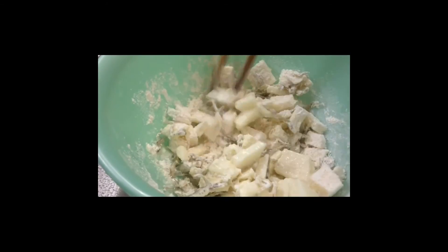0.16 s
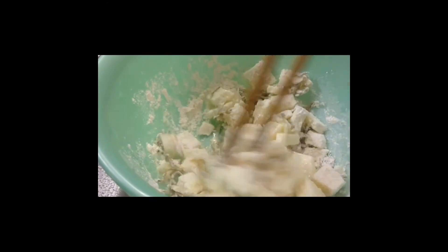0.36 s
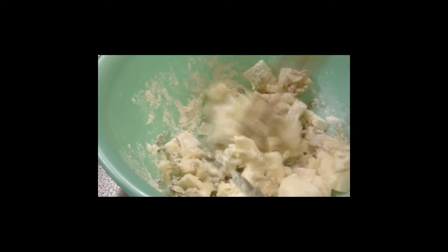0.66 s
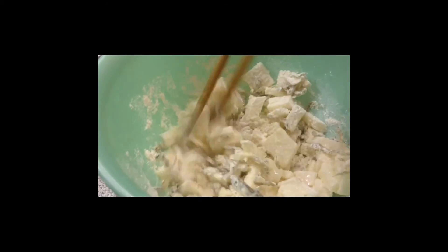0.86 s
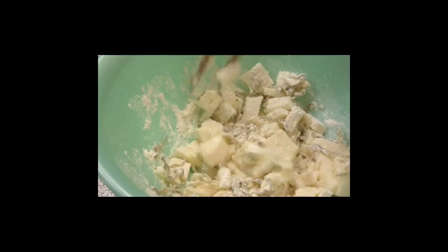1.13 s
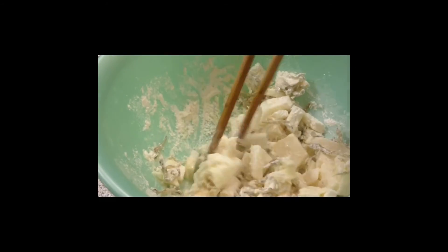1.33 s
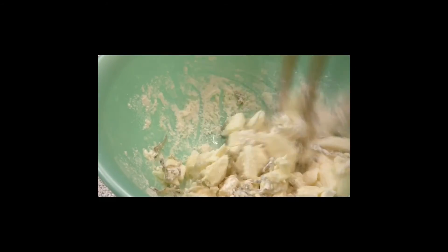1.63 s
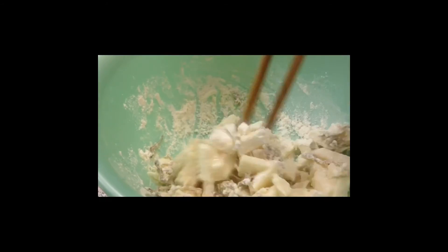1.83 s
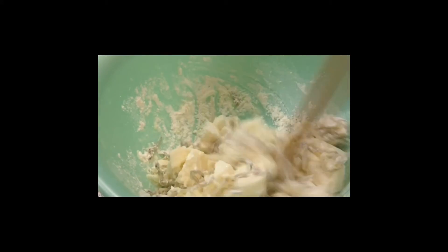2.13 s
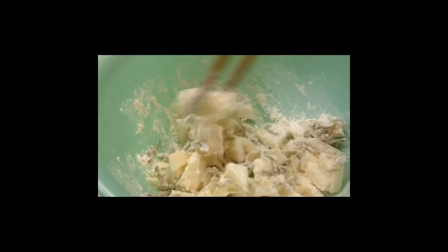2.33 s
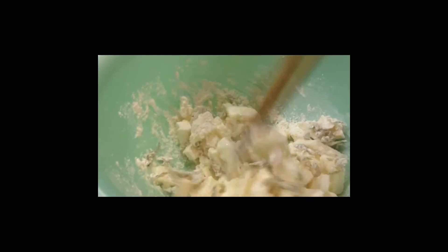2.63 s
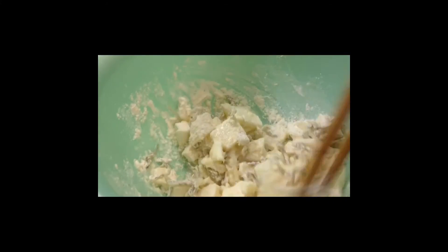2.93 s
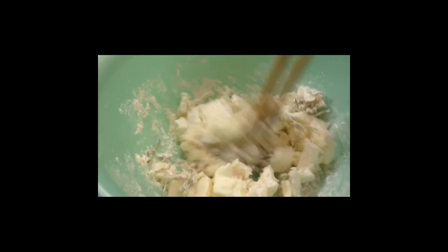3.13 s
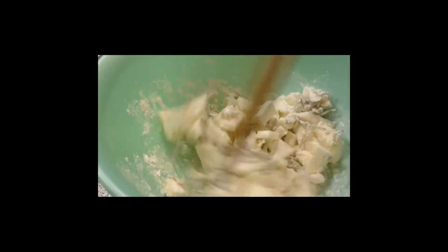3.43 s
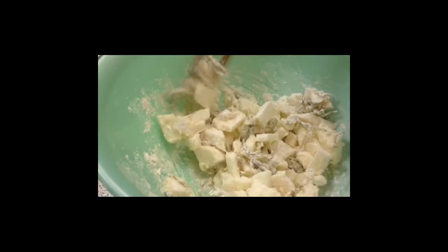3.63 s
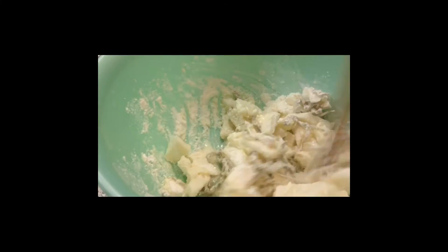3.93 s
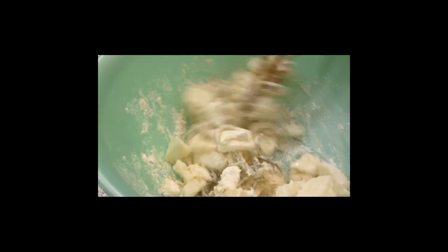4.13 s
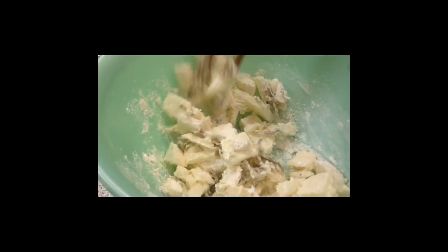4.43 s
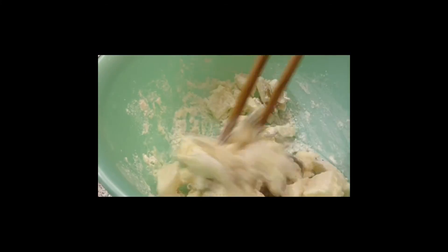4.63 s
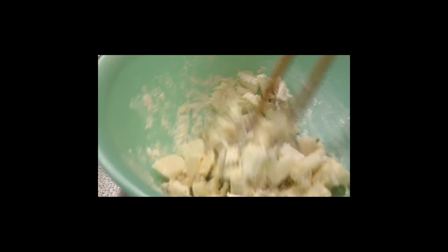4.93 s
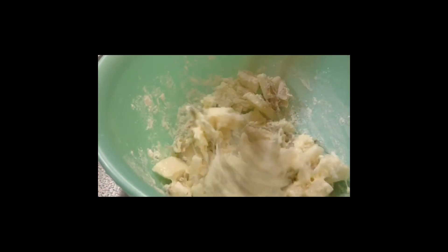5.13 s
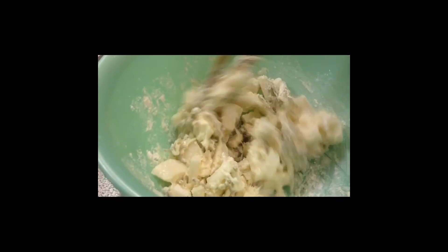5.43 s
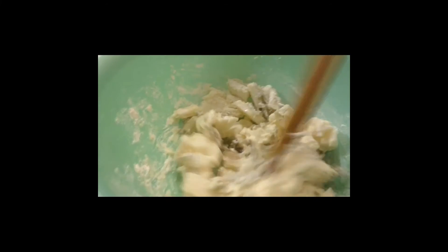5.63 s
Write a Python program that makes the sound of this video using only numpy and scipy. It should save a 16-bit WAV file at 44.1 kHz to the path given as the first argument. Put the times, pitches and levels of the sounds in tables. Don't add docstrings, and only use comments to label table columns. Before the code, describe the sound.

Close to a small microphone in a kitchen, wooden chopsticks stir floury cubes in a thin plastic bowl. Gritty, hissing strokes come and go about two or three times a second, with crackly crumbs, sharp wooden ticks and short hollow bowl thuds. The sticks clack loudest a little after four seconds, then stirring continues over a faint steady hum.

```python
import sys
import numpy as np
from scipy import signal
from scipy.fft import rfft, irfft
from scipy.io import wavfile
from scipy.ndimage import uniform_filter1d

SR = 44100
rng = np.random.default_rng(int(sys.argv[2]) if len(sys.argv) > 2 else 0)


def wav_record(signal):
    frames = np.transpose(np.atleast_2d(signal))
    bounded = np.clip(frames, -1, 1)
    quanta = np.round(bounded * 32767).astype(np.int16)
    wavfile.write(sys.argv[1], SR, quanta)


def amplitude_ratio(level_db):
    exponent = np.asarray(level_db, float) / 20
    return 10 ** exponent


N = 254898

# f/Hz, width/Hz, level/dB
BOWL_DEEP_MODES = [(116.3, 30, -6.5), (145.6, 17.7, 1), (170.9, 11.5, 5.5)]
BOWL_LOW_MODES = [(207, 38, -5.5), (258, 25.7, 2), (348.3, 46, -4.5), (445.7, 18.2, -4)]
BOWL_UPPER_MODES = [(500, 16, 8), (695, 66, 8.5), (860, 91, 9.5), (1023, 210, 3.5), (1080, 25, 7),
                    (1580, 155, 2), (2340, 320, 0.5), (2600, 230, -0.5)]
# f/Hz, width/Hz, level/dB
STICK_MODES = [(1592, 64, 24), (2500, 5400, 3.5), (3200, 500, -38), (4200, 1100, 17.5), (6100, 4200, 1),
               (6600, 420, 14.5)]


def evened(x):
    return x / np.sqrt(np.mean(x ** 2) + 1e-20)


def read(points, hz):
    f, value = np.transpose(points)
    return np.interp(np.log(hz + 1), np.log(f + 1), value)


def follow(rows):
    s, *columns = np.transpose(rows)
    return [np.interp(np.arange(N) / SR, s, c) for c in columns]


def add(mix, s, sound):
    part = mix[round(s * SR):][:len(sound)]
    part += sound[:len(part)]


def coloured(x, points):
    gain = amplitude_ratio(read(points, np.fft.rfftfreq(len(x), 1 / SR)))
    return irfft(rfft(x) * gain, len(x))


def resonate(x, hz, width):
    r = np.exp(-np.pi * width / SR)
    return 2 * signal.lfilter([1 - r], [1, -r * np.exp(2j * np.pi * hz / SR)], x).real


def body(x, modes, damping=1):
    out = 0
    for k, (hz, width, db) in enumerate(modes):
        out = out + (-1) ** k * amplitude_ratio(db) * resonate(x, hz, width * damping)
    return out


def grains(length, per_s, spread_db):
    chance, sign = rng.random((2, length))
    size = amplitude_ratio(spread_db * np.minimum(rng.exponential(1, length), 5))
    return evened(size * np.sign(sign - .5) * (chance < per_s / SR))


def flicker(span_s, depth_db):
    span = round(span_s * SR)
    drift = uniform_filter1d(uniform_filter1d(rng.standard_normal(N), span), span)
    return evened(amplitude_ratio(depth_db * evened(drift)))


def hum():
    # f/Hz, level/dB
    air_spectrum = [(25, -17), (50, -7.5), (80, -11), (125, -8), (165, -3.5), (260, 0.5), (420, -6.5),
                    (640, -13), (1000, -13.5), (2000, -19.5), (4000, -47), (7000, -27), (10000, -31.5),
                    (15500, -28.5)]
    # f/Hz, width/Hz, rms level/dB
    appliance_peaks = [(179.5, 9.1, -64), (264, 75, -68.5), (521.4, 28, -65.5), (2110, 15, -76.5)]
    out = amplitude_ratio(-57) * evened(coloured(rng.standard_normal(N), air_spectrum))
    for hz, width, db in appliance_peaks:
        out += amplitude_ratio(db) * evened(resonate(rng.standard_normal(N), hz, width))
    return out


def strokes(swelling=1, fading=1, dryness=0):
    # landing t/s, swell/s, peak level/dB, fade/(dB/s), dryness of the flour/dB
    stroke_rows = [(0.116, 0.1, -43.5, 302, 3.5), (.24, 0.042, -55, 52, 0), (.4, 0.17, -47, 151, 0),
                   (0.842, 0.0049, -41.5, 101, 1), (1.139, 0.096, -45.5, 101, 0),
                   (1.307, 0.013, -55, 380, 4), (1.471, 0.19, -41.5, 88, 2.5), (1.97, .03, -51.5, 100, -4),
                   (2.029, .025, -50.5, 300, 10.5), (2.05, 0.077, -44, 119, -1), (2.419, 0.01, -40, 600, 1),
                   (2.445, 0.074, -48, 273, 1.5), (2.751, 0.24, -43.5, 109, 1.5),
                   (2.921, 0.034, -44.5, 250, -2.5), (3.1, 0.02, -65, 27, -4), (3.261, 0.043, -47, 113, 2),
                   (3.34, 0.064, -50, 251, -2), (3.574, 0.0059, -54, 900, 0.5),
                   (3.611, 0.054, -42.5, 400, 0.5), (3.7, 0.029, -56, 39, 4.5), (3.8, 0.062, -65, 100, 6),
                   (3.9, 0.18, -40.5, 230, -0.5), (4.13, 0.0088, -61.5, 95, 3), (4.351, 0.011, -43, 200, 1),
                   (4.396, 0.014, -38.5, 400, -8), (4.42, 0.027, -46.5, 123, 4),
                   (4.53, 0.065, -50.5, 165, -1), (4.69, 0.14, -54.5, 115, 4), (5.105, 0.0088, -54, 300, 0),
                   (5.118, 0.0087, -49.5, 60, -1), (5.16, 0.062, -49.5, 68, 0),
                   (5.408, 0.017, -45.5, 306, 4.5), (5.429, 0.024, -39.5, 500, -7),
                   (5.47, 0.11, -45, 238, 2), (5.619, 0.016, -63.5, 64, 6), (5.756, .025, -43.5, 100, 0)]
    land_db_per_s, swell_db_per_s, rest_db = 2000, 60, -66
    lift_s = 0.48
    t = np.arange(0, N, 32) / SR
    power = amplitude_ratio(2 * rest_db)
    for land, swell, db, fade, dry_db in stroke_rows:
        left = np.clip(land + swell - t, 0, swell)
        past = np.maximum(t - land - swell, 0)
        lost_db = swelling * swell_db_per_s * left
        lost_db = lost_db + fading * fade * past * (1.104 + past / lift_s)
        lost_db = lost_db + land_db_per_s * np.maximum(land - t, 0)
        power = power + amplitude_ratio(2 * (db + dryness * dry_db - lost_db))
    return np.interp(np.arange(N) / SR, t, 10 * np.log10(power))


def crumbs(count, per_s):
    out, t = np.zeros(N), np.arange(300) / SR
    for hz in np.geomspace(2200, 9000, count):
        grain = np.sin(2 * np.pi * hz * t) * t * np.exp(-t * hz / 2.2)
        grain = evened(grain) * (2200 / hz) ** .6
        out += signal.oaconvolve(grains(N, per_s / count, spread_db=3.0), grain)[:N]
    return evened(out)


def shifting(x, centre_hz, lift_db, octaves, patchy_db):
    hz, t, z = signal.stft(x, SR, nperseg=256)
    centre = np.interp(t, np.arange(N) / SR, centre_hz)
    away = np.log2((hz[:, None] + 1) / centre) / octaves
    patches = uniform_filter1d(rng.standard_normal(z.shape), 6, 0)
    patches = evened(uniform_filter1d(patches, 10, 1))
    gain = amplitude_ratio(lift_db * np.exp(-away ** 2) + patchy_db * patches)
    return signal.istft(z * gain, SR, nperseg=256)[1][:N]


def drag():
    # t/s, shudder level/dB, hiss centre f/Hz
    load_rows = [(0, -53.5, 3000), (.12, -54.5, 2800), (.7, -56.5, 3720), (.93, -44, 3700),
                 (1.1, -55, 2840), (1.4, -52.5, 3900), (1.54, -49, 3600), (1.9, -55.5, 3200),
                 (2.05, -54.5, 3500), (2.7, -57, 3960), (3.2, -53, 3200), (3.57, -52.5, 2860),
                 (3.65, -48.5, 4200), (3.73, -53.5, 3320), (4.3, -56, 3820), (4.44, -44, 3330),
                 (4.55, -57, 3650), (5.78, -54.5, 4200)]
    # f/Hz, level/dB
    grit_spectrum = [(590, -49), (1000, -43), (1200, 14.5), (1350, 13), (1890, 11.5), (3670, 14.5),
                     (7420, 16), (10000, -28), (13000, -76), (22000, -120)]
    # f/Hz, level/dB
    fizz_spectrum = [(5000, -59), (7800, 5.5), (8800, 1), (10300, -2), (11800, -1.5), (13500, -1),
                     (15000, -1), (16000, -5.5)]
    drag_db = strokes()
    load_db, centre_hz = follow(load_rows)
    effort_db = drag_db + 55
    low_db = load_db + 0.26 * effort_db
    upper_db = -64 + 0.78 * effort_db
    fizz_db = -8 + strokes(swelling=0.76, fading=0.93, dryness=1) - drag_db
    pressure = flicker(0.006, 1.23) * flicker(0.018, 0.73)

    slips = grains(N, per_s=9000, spread_db=1.0)
    hiss = evened(body(slips, STICK_MODES))
    hiss = hiss + amplitude_ratio(0.5) * evened(coloured(slips[::-1], grit_spectrum))
    hiss = evened(hiss) + amplitude_ratio(-2) * crumbs(count=12, per_s=3500)
    hiss = shifting(hiss, centre_hz, lift_db=1.5, octaves=0.4, patchy_db=1.3)
    fizz = evened(coloured(slips, fizz_spectrum)) * amplitude_ratio(fizz_db)

    bumps = grains(N, per_s=1200, spread_db=2.5) * pressure
    low = evened(body(bumps, BOWL_DEEP_MODES + BOWL_LOW_MODES)) * amplitude_ratio(low_db)
    upper = evened(body(bumps, BOWL_UPPER_MODES)) * amplitude_ratio(upper_db)
    return amplitude_ratio(drag_db) * pressure * (evened(hiss) + fizz) + low + upper


def ticks():
    # t/s, peak level/dB, ring f/Hz, upper ring level/dB, t60/s
    tap_rows = [(.0802, -51, 3100, -14, 0.015), (0.1242, -39.5, 1585, -16, 0.046),
                (0.1542, -33, 2440, -15, .013), (0.5468, -30, 2341, -16.5, 0.0046),
                (.548, -34.5, 1610, -20, 0.0099), (.6487, -46.5, 1560, -23, 0.018),
                (3.263, -37, 1600, -20, 0.013), (0.8327, -42, 2400, -6, 0.011),
                (1.126, -28, 2540, -9.5, 0.0084), (1.4684, -25, 2500, -7.5, 0.014),
                (1.9889, -30, 1620, -25, 0.029), (1.9923, -30.5, 2400, -15, 0.0041),
                (2.007, -25.5, 1410, -20, 0.0047), (2.4057, -39, 3080, -4, 0.0088),
                (3.235, -46, 2550, -1, .012), (3.261, -26, 2740, -2, 0.006),
                (3.2882, -40, 2110, -10, 0.008), (3.3054, -31, 1500, -3, 0.0088),
                (3.3835, -39, 2340, -10, 0.012), (3.387, -40, 2320, -14, 0.011),
                (3.574, -45, 2360, -19, .01), (3.5784, -37, 2350, -30, 0.013),
                (3.5788, -37, 2400, -30, 0.0091), (3.7853, -38.5, 2400, -23, 0.012),
                (3.786, -44.5, 1650, -23, 0.014), (3.866, -45.5, 2490, -13, .0069),
                (3.893, -32, 1820, -7, 0.017), (4.5656, -34.5, 1180, -19, 0.028),
                (5.1146, -29, 2540, -7, 0.011)]
    # t/s, peak level/dB, low ring f/Hz, high ring f/Hz, t60/s
    clack_rows = [(0.115, -33.5, 2530, 8250, 0.015), (0.4274, -52, 2530, 3400, 0.01),
                  (0.455, -31, 2650, 4940, 0.0049), (0.537, -30.5, 2870, 3430, 0.013),
                  (0.539, -32, 2260, 3900, 0.004), (0.842, -27.5, 2430, 4900, 0.0051),
                  (0.8482, -27, 1930, 4350, 0.0074), (1.0285, -43, 2100, 5000, 0.0022),
                  (1.9689, -26.5, 2600, 4500, 0.0034), (2.119, -38, 1580, 3220, .014),
                  (2.9471, -32, 3150, 5300, 0.0083), (2.9955, -33, 2300, 4500, 0.012),
                  (3.7545, -39, 2500, 4240, 0.021), (3.8922, -29, 2300, 3520, 0.017),
                  (4.327, -21, 1690, 4250, 0.012), (4.327, -17.5, 2500, 6060, 0.0066),
                  (4.3495, -9, 2900, 5850, 0.0045), (4.4005, -31, 2350, 4600, 0.014),
                  (4.7175, -39.5, 3180, 4850, 0.0044), (4.792, -38, 1270, 6950, 0.014),
                  (4.8334, -40, 2130, 7100, 0.011), (4.883, -31.5, 2450, 6870, 0.0056),
                  (5.371, -42.5, 2260, 5100, 0.0077), (5.4328, -22.5, 2500, 3700, 0.0033),
                  (5.4353, -25, 2600, 5630, 0.0087), (5.504, -37, 4050, 7100, .006),
                  (1.469, -27.5, 4250, 6600, 0.0073), (5.7604, -31, 1640, 3900, 0.013)]
    # t/s, peak level/dB, ring f/Hz
    click_rows = [(0.33, -45, 5900), (.3591, -41, 6900), (0.372, -42.5, 4940), (1.31, -40, 4900),
                  (0.849, -37, 8550), (1.4551, -48, 3660), (1.6192, -31, 4970), (1.931, -48, 8300),
                  (2.0423, -37, 9200), (2.045, -39, 7400), (2.052, -45, 5000), (.649, -46, 7000),
                  (.909, -48, 7200), (.872, -47, 7240), (5.233, -42, 3970), (2.372, -47, 6740),
                  (2.622, -39, 4700), (2.629, -44, 4570), (2.408, -41, 7000), (3.6097, -41, 4340),
                  (3.821, -45.5, 6470), (4.186, -47, 7400), (4.275, -37, 8200), (4.284, -49, 8500),
                  (4.192, -49, 4440), (4.531, -41, 6300), (4.5667, -35.5, 6750), (5.3395, -40, 7200),
                  (5.4131, -37, 6500), (5.429, -40, 8100), (5.5753, -32.5, 4260)]
    # f/Hz, level/dB
    snap_spectrum = [(300, -35), (1000, -61), (3000, 21), (6500, 20.5), (10000, -49), (15000, -75)]
    out, t = np.zeros(N), np.arange(3000) / SR
    # t/s, level/dB, low f/Hz, high f/Hz, high level/dB, t60/s
    rows = [(s, db, hz, 3900, upper_db, t60) for s, db, hz, upper_db, t60 in tap_rows]
    rows += [(s, db, low, high, 3, t60) for s, db, low, high, t60 in clack_rows]
    rows += [(s, db, 2400, hz, 44, .012) for s, db, hz in click_rows]
    for s, db, low_hz, high_hz, high_db, t60 in rows:
        fall_db = -60 * (t / t60) ** 1.1
        low = np.sin(2 * np.pi * low_hz * t) * amplitude_ratio(fall_db)
        high = np.sin(2 * np.pi * high_hz * t) * amplitude_ratio(1.78 * fall_db + high_db)
        snap = evened(coloured(rng.standard_normal(len(t)), snap_spectrum))
        snap = snap * amplitude_ratio(-60 * t / 0.0031 + high_db - 5.0)
        slip = evened(body(rng.standard_normal(len(t)), STICK_MODES))
        slip = slip * amplitude_ratio(-60 * t / 0.024 - 19.5 + 0.66 * min(high_db, 0))
        sound = (low + high + snap + slip) * (1 - np.exp(-t / .00015))
        add(out, s + .0006, amplitude_ratio(db) * sound / abs(sound).max())
    echoes = rng.standard_normal(len(t)) * amplitude_ratio(-60 * t / .035) * (t > .0015)
    echoes *= amplitude_ratio(-8.5) / np.linalg.norm(echoes)
    echoes[0] = amplitude_ratio(2.0)
    return signal.oaconvolve(out, echoes)[:N]


def knocks():
    # t/s, peak level/dB, push/s, upper modes level/dB, deep modes level/dB
    tumble_rows = [(.113, -37, 0.03, -21, -11), (.16, -38, 0.038, -1, -25), (0.455, -38, 0.0074, -25, -13),
                   (0.517, -34.5, 0.047, -20, -18), (0.856, -26.5, 0.024, -16.5, -18),
                   (0.884, -39, 0.024, -16, -18), (2.008, -37, 0.014, -12, -27),
                   (2.431, -32, 0.012, -12.5, -18), (3.267, -32.5, 0.013, -10.5, -8.5),
                   (3.292, -28.5, 0.0081, -20, -22), (3.315, -30, 0.021, -17.5, -20),
                   (3.629, -34, 0.02, -10, -10), (4.008, -31.5, 0.02, -5.5, -15),
                   (4.397, -32, 0.02, -11.5, -16), (4.428, -34, 0.038, -8, -14),
                   (4.561, -25.5, 0.028, -21, -15.5), (4.603, -28, 0.023, -18, -13),
                   (5.125, -33, .02, -15, -20), (5.44, -28.5, 0.0096, -18.5, -19)]
    # t/s, peak level/dB, upper modes level/dB, deep modes level/dB
    rap_rows = [(0.1097, -38, -12, -20), (.151, -34.5, -14, -3.5), (0.8504, -24.5, -20, -20),
                (0.8636, -26.5, -22, -11), (0.866, -25.5, -19, -23), (.877, -29.5, -24, -21),
                (1.1264, -31, -10.5, -27), (1.469, -24, -11, -11), (1.9864, -29.5, -8, -15),
                (2.003, -30.5, -4, -25), (2.119, -33.5, 3, -25), (2.441, -32.5, -10, -20),
                (2.451, -32, -24, -20), (3.231, -38.5, -22, -10), (3.287, -33, -12, -14),
                (3.3045, -23.5, -11, -18), (3.444, -39.5, -30, -11), (3.598, -31.5, -4, 4),
                (3.892, -37.5, -10, -33), (4.3263, -26, -13.5, -17), (4.552, -25.5, -35, -11),
                (4.5573, -22, -20, -15.5), (4.564, -27.5, -14, -14), (4.5859, -24.5, -16, -19),
                (4.597, -25, -18, -20), (5.1139, -24, -14.5, -18), (5.121, -34, -13, -24),
                (5.431, -26, -11, -24), (5.436, -29, -14, -24), (5.755, -34, -15, -7.5)]
    out, t = np.zeros(N), np.arange(12000) / SR
    rap_push_s, soft_s, cushion_s = 0.003, .00025, 0.00017
    give = np.exp(-1 / (cushion_s * SR))
    rows = [(*row, 0.99, 15) for row in tumble_rows]
    rows += [(s, db, rap_push_s, *modes_db, 1.28, 45) for s, db, *modes_db in rap_rows]
    for s, db, push_s, upper_db, deep_db, damping, contact in rows:
        shove = grains(len(t), per_s=1200, spread_db=0.0) * np.exp(-t / push_s)
        shove[0] += contact
        shove = uniform_filter1d(shove, round(soft_s * SR), origin=-4, mode="constant")
        shove = signal.lfilter([1 - give], [1, -give], shove)
        sound = evened(body(shove, BOWL_LOW_MODES, damping))
        sound += amplitude_ratio(upper_db + 11.0) * evened(body(shove, BOWL_UPPER_MODES, 1.2 * damping))
        sound += amplitude_ratio(deep_db + 10.5) * evened(body(shove, BOWL_DEEP_MODES, damping))
        add(out, s + 0.00105, amplitude_ratio(db) * sound / abs(sound).max())
    return out


def specks():
    # t/s, peak level/dB
    speck_rows = [(0.1164, -30), (0.154, -28), (0.4544, -33), (0.5726, -37), (0.8415, -31), (1.4546, -59),
                  (1.4686, -29), (1.9305, -41), (2.031, -31), (2.4064, -37), (2.4274, -44), (2.837, -34),
                  (2.935, -33), (3.0759, -33), (3.1916, -38), (3.2784, -42), (3.466, -41), (3.574, -42),
                  (4.2742, -44), (4.327, -31), (4.349, -25), (4.3999, -38), (4.7347, -31.5), (4.793, -35),
                  (4.8474, -33), (5.2115, -25.5), (5.391, -31), (5.4266, -37), (5.6501, -35),
                  (5.7588, -32.5)]
    out, t = np.zeros(N), np.arange(300) / SR
    for s, db in speck_rows:
        noise = uniform_filter1d(rng.standard_normal(len(t) + 2), size=2)
        snap = np.diff(noise, 2) * amplitude_ratio(-60 * t / 0.0021)
        add(out, s + 0.00097, amplitude_ratio(db - 2.5) * snap / abs(snap).max())
    return out


def kitchen(x):
    # f/Hz, t60/s
    room_decay = [(100, 0.16), (400, 0.19), (1500, 0.34), (4000, 0.11), (12000, 0.12)]
    reflections = np.zeros(SR // 2)
    start = np.arange(150, SR // 2 - 20, 20)
    arrival = start + rng.integers(0, 20, len(start))
    reflections[arrival] = rng.choice([-1., 1.], len(start))
    hz, t, z = signal.stft(reflections, SR, nperseg=256)
    decay = amplitude_ratio(-60 * t / read(room_decay, hz)[:, None])
    tail = signal.istft(z * decay, SR, nperseg=256)[1]
    return signal.fftconvolve(x, tail / np.linalg.norm(tail))[:N]


def scene():
    air, stroke = hum(), drag()
    hits = knocks() + specks() + ticks()
    room = kitchen(amplitude_ratio(-13.0) * hits + amplitude_ratio(-11.5) * stroke)
    return (hits + stroke + room + air)[None]


def roll_off(x):
    return signal.sosfilt(signal.butter(12, 16500, fs=SR, output="sos"), x)


def record(dry):
    thin = signal.sosfilt(signal.butter(2, 110, "high", fs=SR, output="sos"), dry)
    dull = signal.oaconvolve(thin, signal.firwin(511, 15380, fs=SR)[None], "same")
    mix = dull + amplitude_ratio(-44) * (thin - dull)
    return roll_off(mix)


dry = scene()
out = record(dry)
wav_record(out)
```